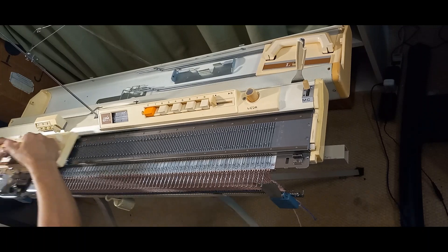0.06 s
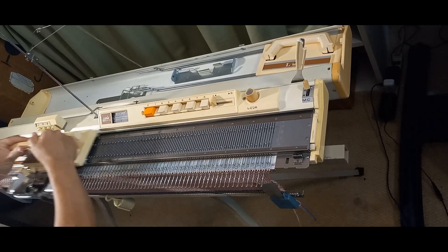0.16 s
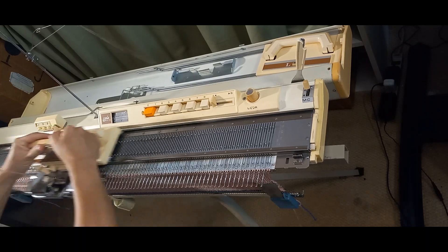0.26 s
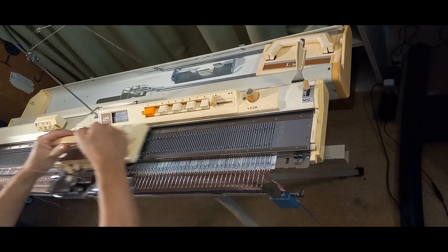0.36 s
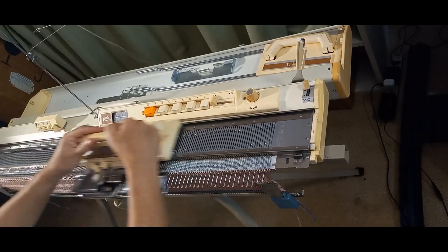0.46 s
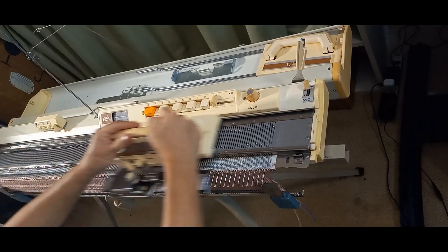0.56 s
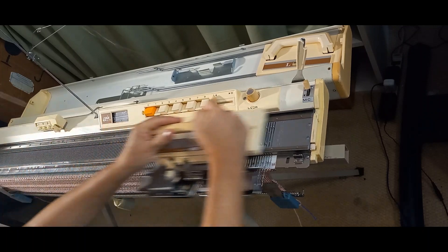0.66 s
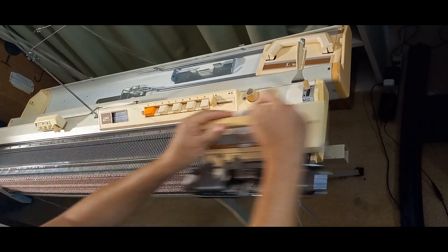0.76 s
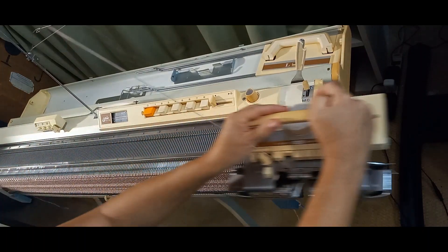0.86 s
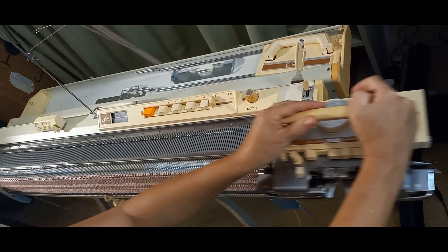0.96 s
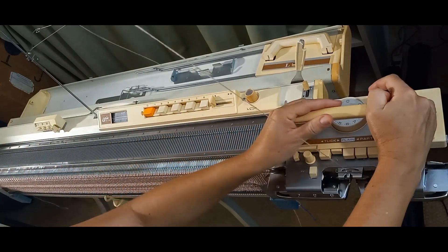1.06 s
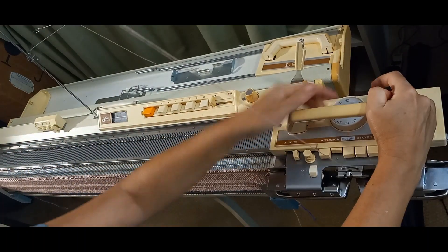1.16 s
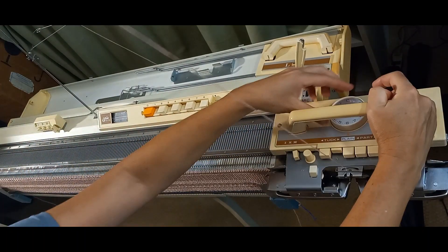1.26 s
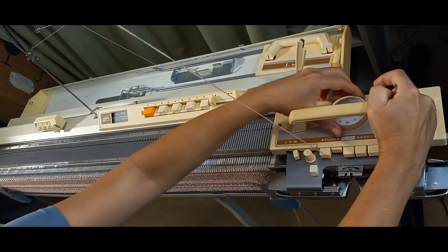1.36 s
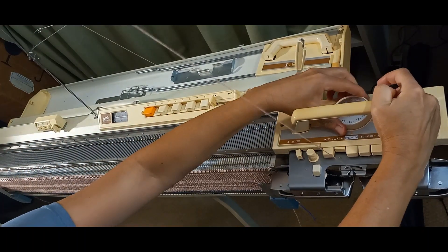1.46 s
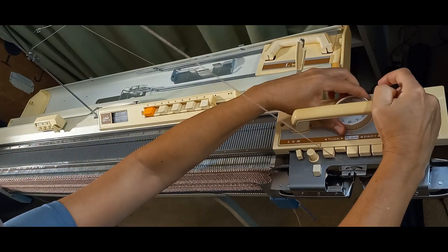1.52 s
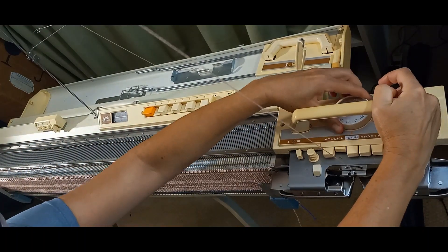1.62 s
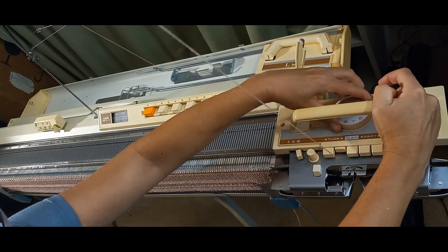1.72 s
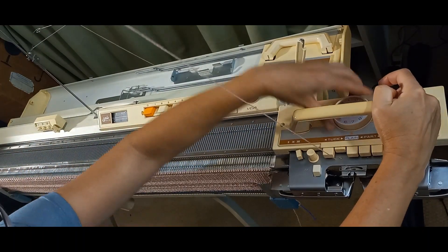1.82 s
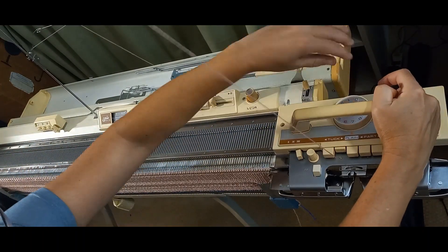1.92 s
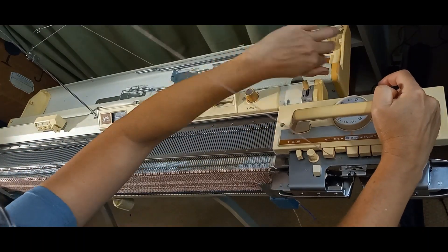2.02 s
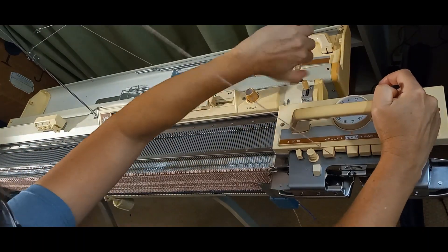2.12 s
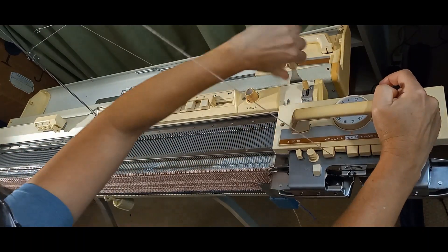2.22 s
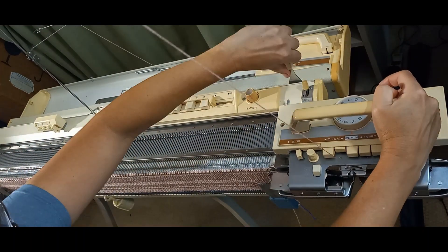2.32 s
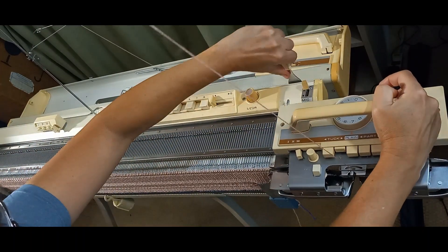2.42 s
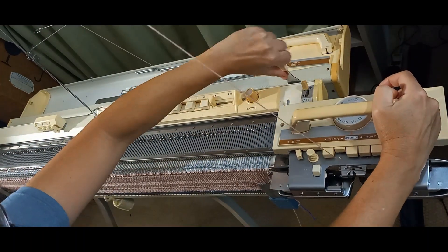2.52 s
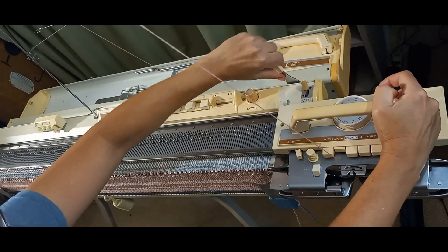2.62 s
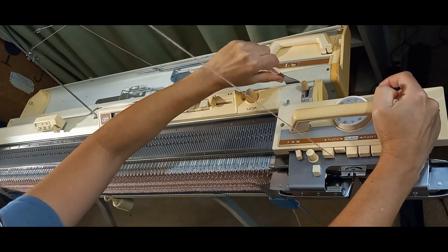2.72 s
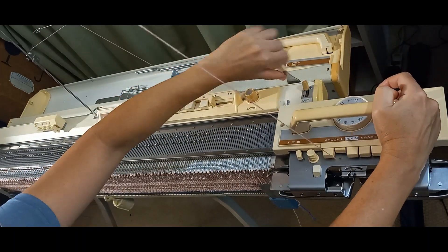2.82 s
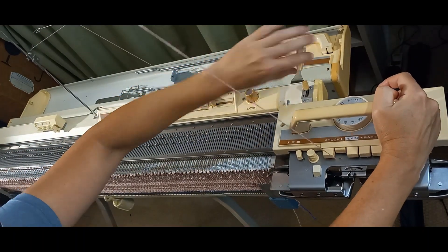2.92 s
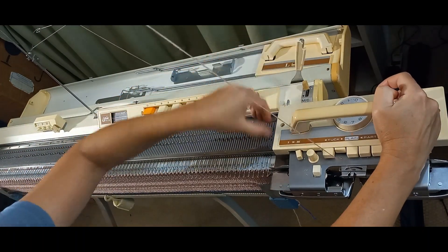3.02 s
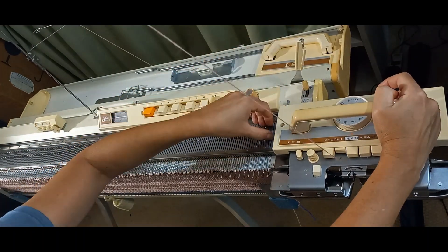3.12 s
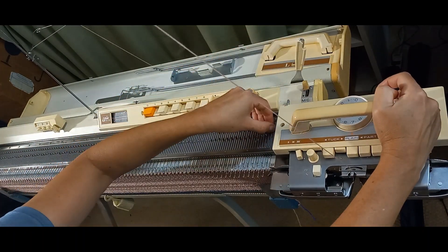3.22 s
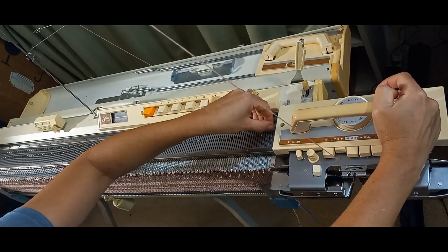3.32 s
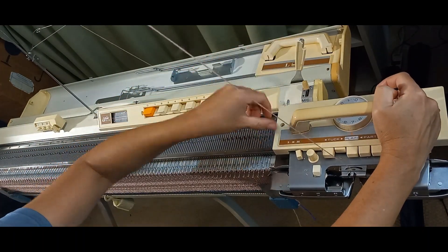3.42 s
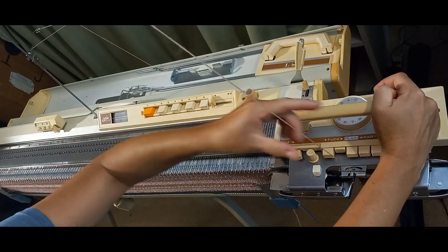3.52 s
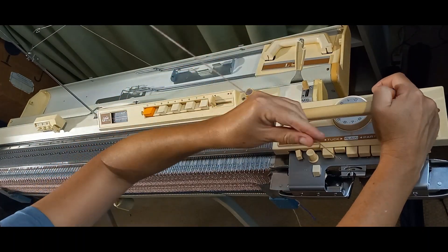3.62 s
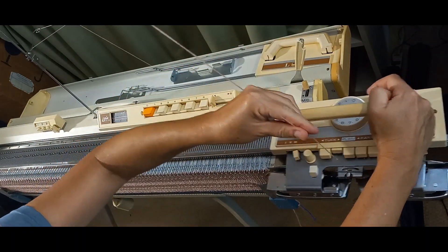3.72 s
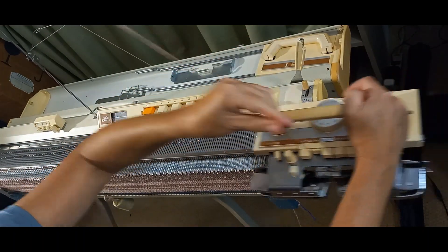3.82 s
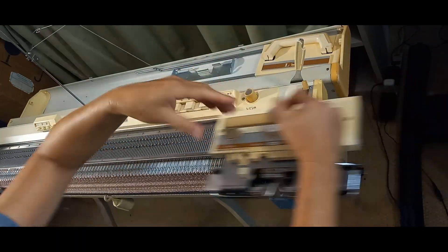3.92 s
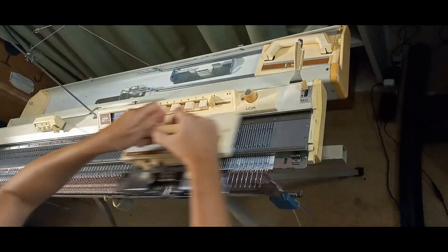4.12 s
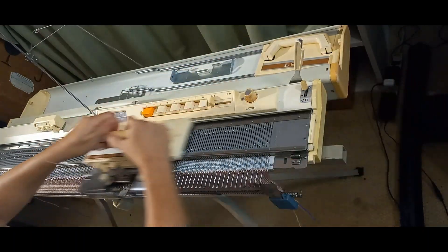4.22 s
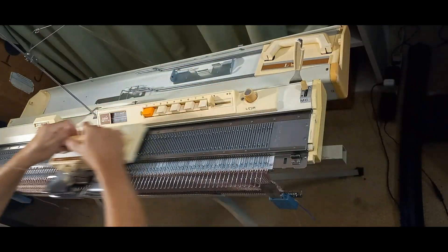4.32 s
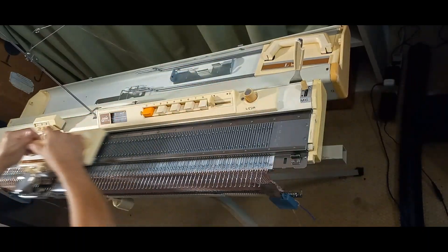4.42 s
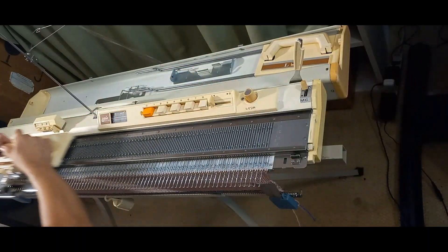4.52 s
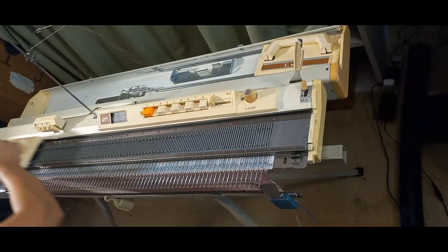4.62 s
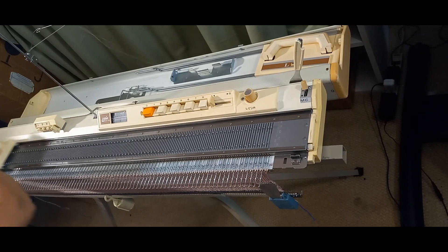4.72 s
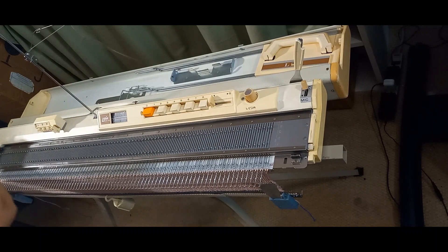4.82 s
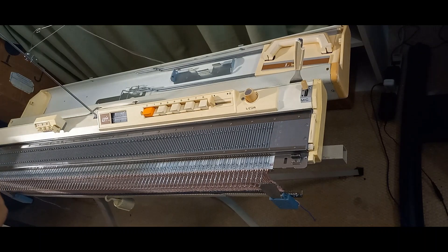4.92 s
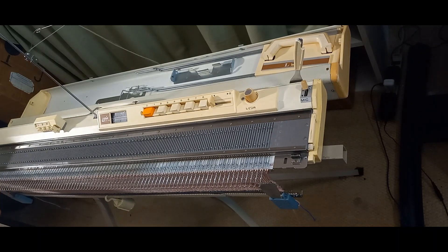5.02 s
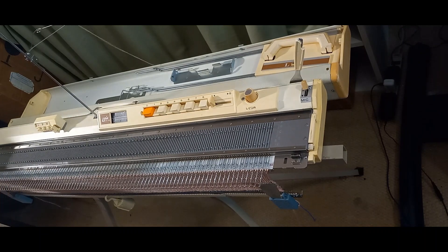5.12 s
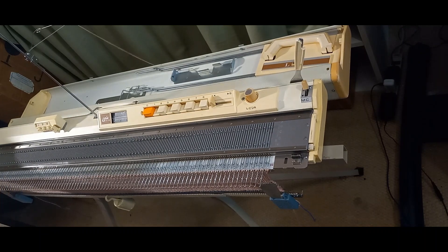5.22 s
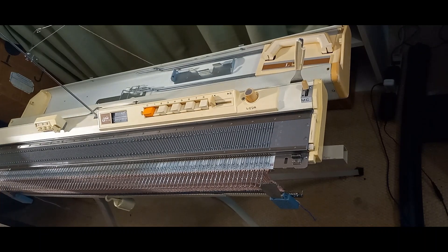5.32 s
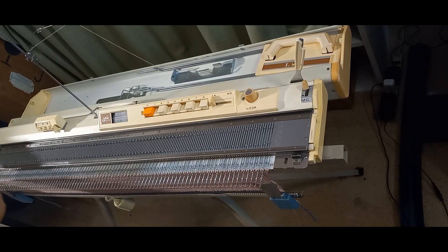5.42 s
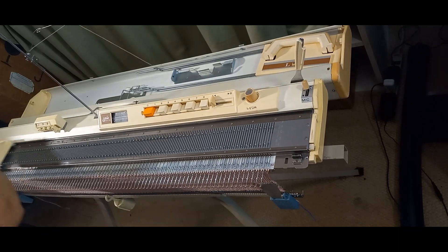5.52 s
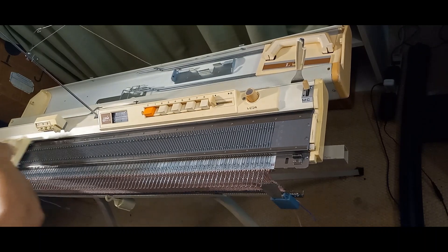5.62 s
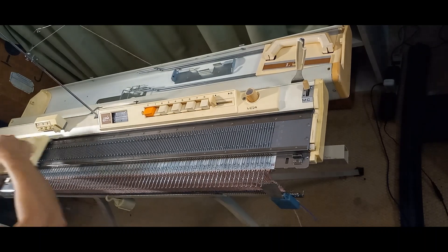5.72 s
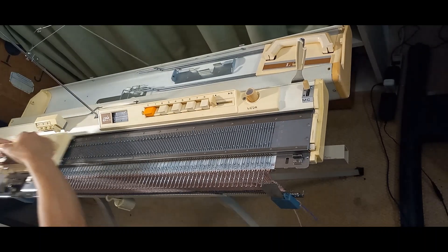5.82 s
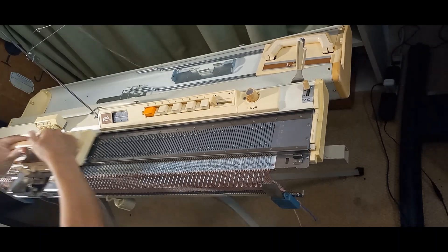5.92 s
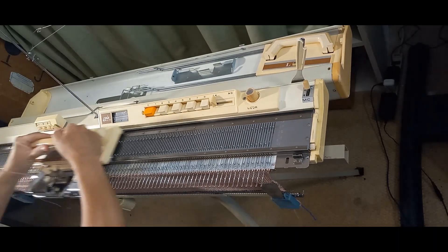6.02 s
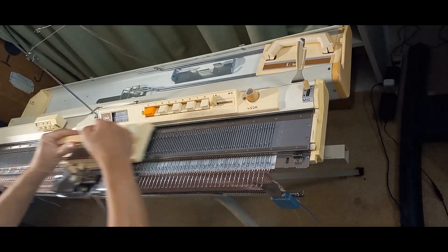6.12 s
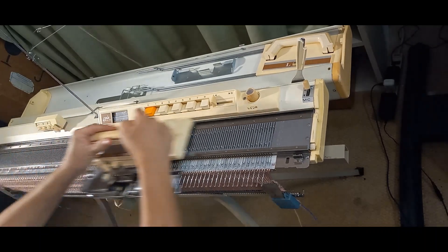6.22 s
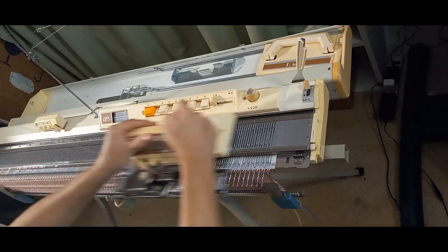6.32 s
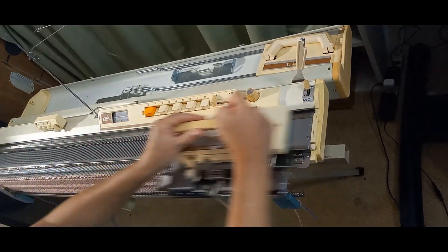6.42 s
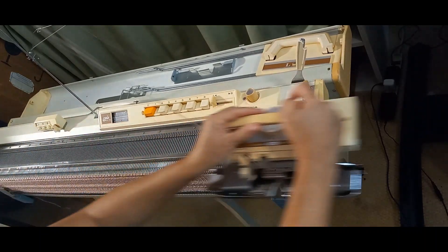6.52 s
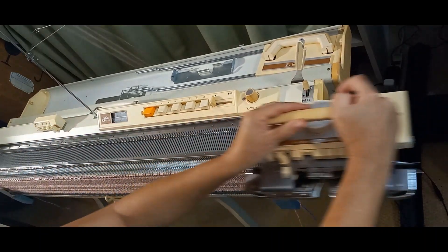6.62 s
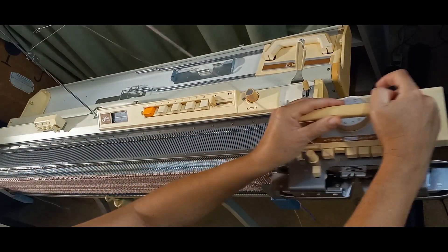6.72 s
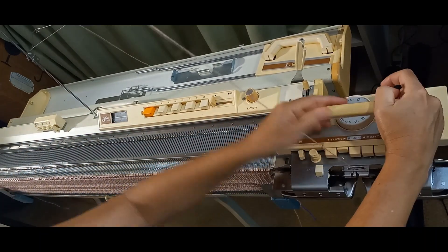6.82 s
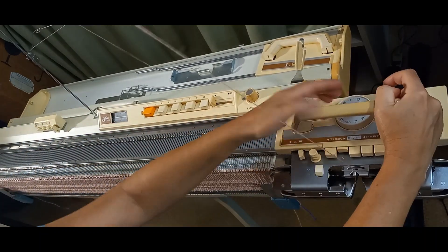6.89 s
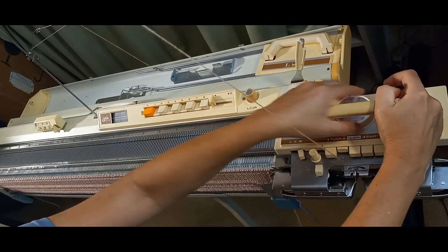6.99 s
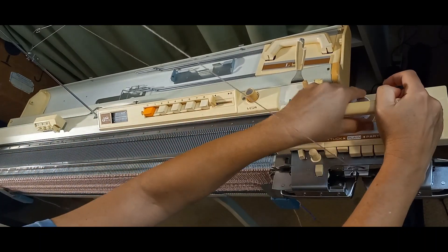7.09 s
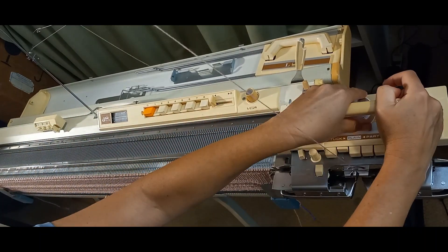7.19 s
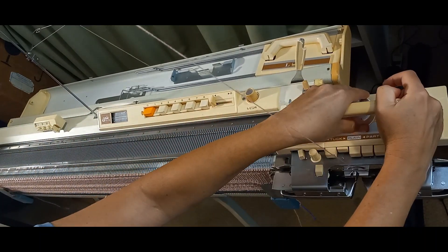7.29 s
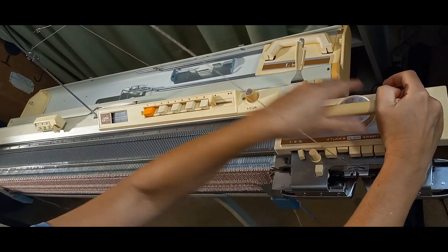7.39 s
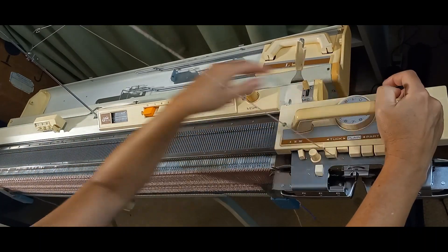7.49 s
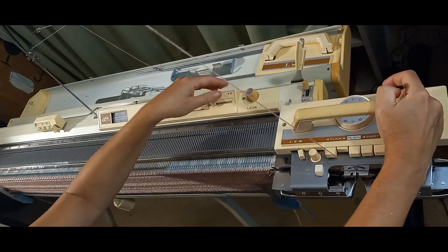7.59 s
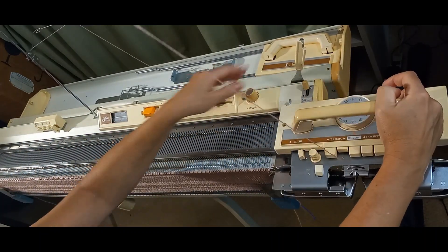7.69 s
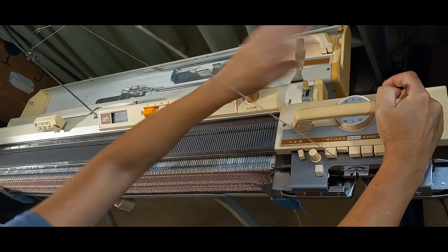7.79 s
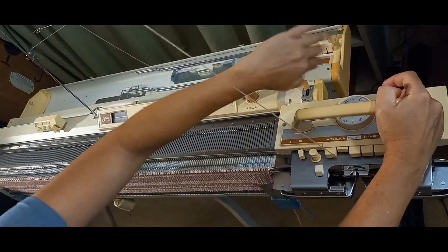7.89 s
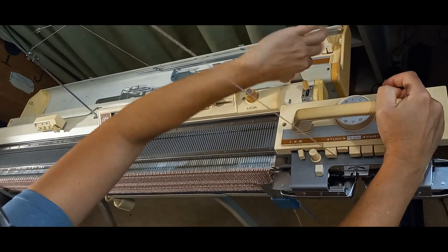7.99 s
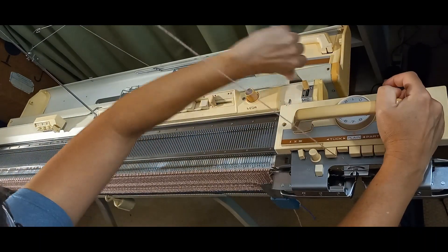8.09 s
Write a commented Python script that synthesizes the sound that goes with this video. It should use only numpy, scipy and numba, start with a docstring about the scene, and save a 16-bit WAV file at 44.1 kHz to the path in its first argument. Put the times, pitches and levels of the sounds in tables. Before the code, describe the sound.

A hand-pushed knitting machine carriage is already clattering loudly over metal needles, with thin squeaks, and stops with a hard snap after about a second. Levers click and parts knock on the plastic case, then a second harsh run follows. After a short pause with a few clicks comes a third, ending in a bright snap and more clicks. Close stereo microphone, small indoor room, low hum.

```python
"""At once a dense clatter is heard: a knitting machine carriage, pushed by hand three times along its bed.
Noise shaped by random needle ticks makes the clatter; resonant noise makes housing, rail and table ring along.
Between passes, decaying noise and damped sines give levers and knocks on the case, over a low room tone.
Gliding sines squeak, short modes tick, and the gain control of a small stereo camera close by rides it all."""
import sys
import numpy as np
from scipy import signal
from scipy.fft import rfft, irfft, next_fast_len
from scipy.io import wavfile
from scipy.ndimage import uniform_filter1d
from numba import njit

SR = 44100
rng = np.random.default_rng(int(sys.argv[2]) if len(sys.argv) > 2 else 0)


def generate_wav(sig):
    """Save sig (samples, or channels by samples) to the path in sys.argv[1] as 16-bit PCM at SR."""
    pcm = np.round(np.clip(np.atleast_2d(sig).T, -1, 1) * 32767).astype(np.int16)
    wavfile.write(sys.argv[1], SR, pcm)


def linear_from_db(decibels):
    """Turn decibels (scalar or array-like) into linear amplitude factors; 0 gives 1."""
    return 10 ** (np.asarray(decibels, float) / 20)


N = 359415
TIME = np.arange(N) / SR
SIZE = next_fast_len(N)
FREQ = np.maximum(np.arange(SIZE // 2 + 1) * SR / SIZE, 1)

# room hum and hiss, relative spectra: pitch_hz, density_db
HUM_SPECTRUM = [(18, -68), (30, -41), (76, -57), (102, -12), (177, 2), (257, -5.5), (519, -11.5), (579, -7),
                (991, -19), (1210, -25.5), (2500, -29.5), (3250, -30), (5500, -120)]
HISS_SPECTRUM = [(710, -10.5), (1200, -1), (1720, -5.5), (2050, -8.5), (3310, -11.5), (3600, -10),
                 (5570, -14), (7670, -15), (8450, -13), (15400, -18.5)]
# likeness of left and right, for near sources and for the room: pitch_hz, correlation
NEAR_LIKENESS = [(60, 0), (300, 0.85), (700, 0.57), (1400, 0.39), (3100, 0.45), (6000, 0.)]
ROOM_LIKENESS = [(60, 0.2), (300, 0.12), (700, 0.06), (3000, 0.012)]
# soft deep thumps, under some of the clicks: start_s, level_db
SOFT_THUMPS = [(1.326, -61), (1.874, -56), (2.006, -65), (2.315, -55), (2.984, -54), (3.855, -54),
               (3.903, -46), (5.03, -52), (5.464, -55), (7.496, -73), (8.125, -55)]
# the table booms as a push sets in: start_s, level_db
SHOVES = [(0.02, -41), (5.5, -34.5)]
# the table resonance of that boom: pitch_hz, width_hz, level_db
SHOVE_RESONANCE = [(259, 41, 0)]
# fingers and yarn scrape over the carriage:
# loudest_s, level_db, swell_db_per_s, fade_db_per_s, housing_db re scrape
SCRAPES = [(2.15, -49.5, 900, 200, 3.5), (2.64, -46, 95, 75, -1), (2.751, -38.5, 350, 501, -1.5),
           (2.953, -34.5, 341, 167, 1.5), (3.851, -38, 1105, 3000, -1), (5.039, -27.5, 1097, 550, -8)]
# a small steel part rings on when the carriage stops: start_s, level_db
PINGS = [(.94, -37), (6.68, -32.5)]
# levers snap over: start_s, snap_db, case_ring_db re snap, decay_s
LEVERS = [(1.3272, -18.5, -21, 0.079), (1.875, -18, -16, 0.087), (1.9822, -25.5, -12.5, 0.12),
          (2.3156, -17, -17, 0.086), (3.8552, -13.5, -15, 0.12), (5.275, -21.5, -9, 0.11),
          (5.391, -23.5, -7.5, 0.1), (7.0778, -18, -14, 0.12), (7.4946, -15, -17, 0.093)]
# fingers and parts knock the case:
# start_s, snap_db, case_ring_db re snap, favoured_hz, housing_knock_db re snap
KNOCKS = [(0.9904, -24, -5, 651, 0), (1.002, -25, -11, 711, -15), (1.065, -33, -5, 651, -7),
          (1.0794, -33, -10, 678, -5), (2.0066, -15, -17.5, 970, -4.5), (2.14, -45, 5, 1310, 17.5),
          (2.3296, -25, -9, 735, 2), (2.446, -50, -3, 1310, 18), (2.477, -35.5, -8, 1190, -3),
          (2.993, -16, -4.5, 708, 7.5), (3.0195, -27, -2, 700, 5), (5.0455, -31, 5, 720, 0),
          (3.302, -34, -20, 651, -2), (3.8652, -22, -23, 662, 3), (6.704, -15.5, -7.5, 764, 2.5),
          (6.818, -46, 8, 1150, 2), (6.9242, -37.5, -7, 680, 1), (7.339, -34, -16.5, 706, 1),
          (8.096, -34, -18, 1350, 2), (8.1256, -24.5, -23, 980, -3.5)]
# parts slide home with a soft start:
# start_s, snap_db, case_ring_db re snap, housing_knock_db re snap, decay_s
SLIDES = [(2.819, -28, -28, 4, 0.11), (2.8746, -12, -19, -3, 0.093), (2.9866, -5, -18.5, -7.5, 0.081),
          (5.0344, -21.5, 1.5, 6.5, 0.13)]
# cams catch or drop the end needles: start_s, snap_db, housing_knock_db re snap, crack_db re snap
CATCHES = [(0.961, -7, -16, 10), (3.904, -14, -12, -3), (3.919, -14.5, -21, 18), (4.911, -6, -19, 4),
           (5.465, -19, 2, 8), (5.492, -19.5, -5, 6), (5.552, -12.5, -31, 7), (6.6795, -4, -17, 8)]
# relative spectrum of a snap: pitch_hz, density_db
SNAP_SPECTRUM = [(1470, -36), (2500, -17.5), (4070, -1), (4520, -2.5), (4870, -5.5), (7930, -3.5),
                 (8800, -8), (10000, -8.5), (13000, -20), (22000, -120)]
# plastic case modes: pitch_hz, level_db, t60_s
CASE_MODES = [(708, 4.5, 0.11), (989, -1, 0.18), (1161, 4.5, 0.07), (1187, 5.5, 0.068)]
# the last needle snaps back as the carriage stops: start_s, level_db
STOPS = [(0.9605, -11.5), (6.6795, -8)]
# modes of that needle, and of a lever's steel spring: pitch_hz, level_db, t60_s
STOP_MODES = [(3050, 1, 0.0081), (4000, -2, 0.006), (5100, 1, 0.0099), (6300, -9, 0.0064),
              (9200, -5, 0.0054), (11800, -2, 0.005)]
SPRING_MODES = [(4005, -2, 0.015), (4410, -3, 0.01), (5880, -3, 0.015), (7075, 0, 0.018), (8000, -3, 0.012),
                (11200, -5, 0.01)]
# narrow gliding whistles: steel squeaking on steel, and near 2.95 s a narrow band of the finger scrape:
# start_s, length_s, first_hz, last_hz, level_db
SQUEAKS = [(0.3, 0.27, 4290, 4340, -26.5), (0.813, 0.089, 6040, 5500, -20), (0.85, 0.074, 4550, 4470, -24),
           (2.705, 0.02, 3100, 3100, -46), (2.94, 0.035, 1596, 2060, -34.5),
           (2.947, 0.042, 1930, 1750, -39), (6.198, 0.1, 4400, 4100, -24), (6.44, 0.082, 6000, 6200, -24),
           (6.536, 0.082, 5750, 5730, -20), (6.567, 0.038, 2400, 2390, -18)]
# the carriage jolts over a cam mid-pass: start_s, level_db, favoured_hz
JOLTS = [(0.39, -7, 2800), (4.478, -2, 2050), (5.596, -17, 1500), (6.1492, -4, 2700)]
# one list a pass: time_s, clatter_db, housing_db re clatter, latches_db re clatter
PASSES = [
    [(0.0, -13.5, -6.5, -4.5), (0.2, -12.5, -7.5, -6), (0.4, -10.5, -11, -12.5), (0.82, -9, -11, -10),
     (0.91, -11, -10, -3), (0.934, -25.5, -5, -1), (0.97, -33, 2, -7), (1.03, -43, -4, -12),
     (1.18, -58, 4, -12)],
    [(3.89, -56, -2, -16), (3.913, -38, 6, -14), (3.922, -19, -15.5, -18), (3.98, -12, -11.5, -21),
     (4.3, -11.5, -12, -18), (4.76, -10.5, -7, -24), (4.82, -13.5, -8.5, -28), (4.9, -25.5, -5.5, -17),
     (5.04, -50.5, -9, -13)],
    [(5.48, -46, -3, -10), (5.5, -25, -13, -23), (5.53, -26, -9.5, -20), (5.58, -14, -10, -22),
     (5.8, -11, -7.5, -10), (6.05, -10, -10.5, -10), (6.55, -8.5, -11, -10), (6.635, -11, -8, -3),
     (6.665, -21, -9, -9), (6.75, -45, 1, -17), (6.93, -61, -8, -19)],
]
# relative spectrum of the needle ticks: pitch_hz, density_db
NEEDLE_SPECTRUM = [(1180, -21), (2000, -26), (2410, -2.5), (3280, -4.5), (4200, -2.5), (5420, -4),
                   (6770, -2), (7630, -3), (8380, 0), (15400, -2)]
# resonances of housing, table, loose latches and steel rail: pitch_hz, width_hz, level_db
HOUSING = [(1350, 960, 3.5), (1577, 210, -0.5), (1752, 55, -4), (1895, 114, 0), (2118, 140, -1.5),
           (2390, 86, -4), (2885, 2000, -2)]
TABLE = [(176, 45, -9.5), (220, 35, -13.5), (279, 43, -3.5), (366, 45, -4.5), (438, 45, -1), (512, 45, -6),
         (614, 71, 1), (708, 115, -0.5), (776, 55, -4.5), (873, 60, -2.5), (940, 53, -3), (1017, 44, -4.5),
         (1179, 46, -6)]
LATCHES = [(6150, 870, -15), (5130, 3800, -2)]
RAIL = [(4440, 1200, 0.27), (8270, 500, -1), (6770, 350, -0.00021)]
# centre of a gliding narrow band, thinned at random during the passes: time_s, pitch_hz
THINNED_PATH = [(0.0, 830), (0.2, 930), (0.33, 1070), (0.5, 1010), (0.65, 970), (0.84, 905), (3.97, 820),
                (4.15, 970), (4.3, 1080), (4.5, 1100), (4.75, 970), (5.53, 1050), (5.8, 960), (5.92, 786),
                (6.06, 970), (6.25, 990), (6.45, 1020), (6.56, 830)]
# further narrow bands thinned at random: pitch_hz, width_hz, wander_share, readiness (-1 to 1)
THINNED_BANDS = [(332, 73, 0.026, 0.46), (475, 106, 0.097, -0.19), (720, 110, 0.06, -0.8),
                 (830, 108, 0.044, -0.22)]


def rms1(x):
    """Normalization: scale to rms 1."""
    return x / np.sqrt(np.mean(x ** 2))


def points(table):
    """Spectral interpolation: (Hz, value) points on a log-frequency axis."""
    hz, value = np.transpose(table)
    return np.interp(np.log(FREQ), np.log(hz), value)


def peaks(table):
    """Resonance: the summed gain of simple resonators, each applied twice."""
    return sum(linear_from_db(db) / (1 + ((FREQ ** 2 - hz ** 2) / (FREQ * width)) ** 2) for hz, width, db in table)


def noise(gain, likeness=NEAR_LIKENESS):
    """Interaural coherence: coloured noise at rms 1, likeness set by frequency, the left side first."""
    right_late_s = 6e-5
    late = np.exp(-2j * np.pi * FREQ * right_late_s)
    mid, side = rfft(rng.standard_normal((2, SIZE)))
    like = np.clip(points(likeness), 0, 1)
    mid, side = mid * np.sqrt(1 + like), side * np.sqrt(1 - like)
    return rms1(irfft(gain * np.array([mid + side, (mid - side) * late]), SIZE)[:, :N])


def highpass(x, order, hz):
    """High-pass filtering: a Butterworth filter removes what lies below hz."""
    return signal.sosfilt(signal.butter(order, hz, "high", fs=SR, output="sos"), x)


def fade(power, t60):
    """Exponential decay: every kick of power dies away by 60 dB in t60 s."""
    return signal.lfilter([1], [1, -np.exp(-np.log(1e6) / (t60 * SR))], power)


def walls(power):
    """Reverberation: the walls spread a share of the power into a tail."""
    t60_s, share_db = 0.19, -33
    return power + linear_from_db(2 * share_db) * fade(power, t60_s) * np.log(1e6) / (t60_s * SR)


def walk(rate):
    """Random modulation: levels held 1 / rate s, smoothed twice, without slow drift; rms 1."""
    k = int(SR / rate)
    held = np.repeat(rng.standard_normal(N // k + 1), k)
    smooth = uniform_filter1d(uniform_filter1d(held, k), k)[:N]
    return rms1(smooth - uniform_filter1d(smooth, size=6 * k))


def clatter(rate, spread_db, t60):
    """Poisson process: power of overlapping ticks at random moments, some harder than the rest; mean 1."""
    hardness_db = spread_db * rng.exponential(size=N).clip(0, 4)
    power = fade((rng.random(N) < rate / SR) * linear_from_db(2 * hardness_db), t60)
    return power / power.mean()


def drifting(x, share):
    """Frequency shift by playing speed: as the speed wanders slowly, a resonance glides up and down."""
    place = np.arange(N) + np.cumsum(share * walk(4))
    return np.array([np.interp(place, np.arange(N), side) for side in x])


def ringing(table, gap_db, rate, order=1, drift=0.025):
    """Random band gating: each resonance drifts in pitch and is dimmed at random by up to gap_db."""
    total = 0
    for hz, width, db in table:
        gap = (2 * (walk(rate) - .3)).clip(0, 1)
        band = noise(peaks([(hz, width * np.sqrt(order), 0)]) ** order)
        total = total + linear_from_db(db - gap_db * gap) * drifting(band, drift)
    return rms1(total)


def wavering(turns, a, b):
    """Quadrature modulation: size and phase of a tone waver by two walks, differently left and right."""
    sine, cosine = np.sin(2 * np.pi * turns), np.cos(2 * np.pi * turns)
    return np.array([a * sine + b * cosine, b * sine + a * cosine])


def room():
    """Stationary background noise: a wavering low hum and a smooth hiss."""
    hum_db, hiss_db = -41.5 + 1.03 * walk(9), -49.5 + 2.0 * walk(15)
    hum = linear_from_db(hum_db) * noise(linear_from_db(points(HUM_SPECTRUM)), ROOM_LIKENESS)
    hiss = linear_from_db(hiss_db) * noise(linear_from_db(points(HISS_SPECTRUM)), ROOM_LIKENESS)
    return hum + hiss


def thumps():
    """Low-frequency transient: soft deep thumps of low resonant noise with a bell-shaped power."""
    power = sum(linear_from_db(2 * db) * np.exp(-((TIME - s - .01) / 0.015) ** 2) for s, db in SOFT_THUMPS)
    return np.sqrt(power) * noise(peaks([(38.7, 52, 0)]))


def shoves():
    """Forced resonance: the table swells low as the push sets in, then dies away."""
    peak_after_s = 0.13
    swell = 0
    for s, db in SHOVES:
        x = (TIME - s).clip(0) / peak_after_s
        swell = swell + linear_from_db(db) * x * np.exp(1 - x)
    return swell * noise(peaks(SHOVE_RESONANCE))


def scrapes():
    """Friction: a grainy rub swells and fades, partly sounding in the housing."""
    power = np.zeros((2, N))
    for s, db, swell, dies, housing_db in SCRAPES:
        below_peak_db = np.maximum(swell * (s - TIME), dies * (TIME - s))
        power += linear_from_db(2 * (db - below_peak_db + np.array([[0], [housing_db]])))
    rub, body = power * clatter(900, 0.9, 0.036)
    return np.sqrt(rub) * noise(linear_from_db(points(NEEDLE_SPECTRUM))) + np.sqrt(body) * noise(peaks(HOUSING))


def pings():
    """Lightly damped vibration: a thin, slightly wavering steel ring."""
    ping_hz, t60_s = 10445, 0.45
    power = 0
    for s, db in PINGS:
        power = power + linear_from_db(2 * db) * (TIME > s) * np.exp(-np.log(1e6) * np.abs(TIME - s) / t60_s)
    return np.sqrt(power) * wavering(ping_hz * TIME, 1 + .2 * walk(120), 0.4 * walk(120))


def blows():
    """Impact parameters, one form: s, snap dB, case dB, case Hz, knock dB, top dB, decay s, crack dB."""
    levers = [(s, db, case_db, 1170, -10.5, -7, t60, 9.5) for s, db, case_db, t60 in LEVERS]
    # harder knocks are brighter
    knocks = [(s, db, case_db, hz, knock_db, 9 + .35 * db, 0.1, 1.5)
              for s, db, case_db, hz, knock_db in KNOCKS]
    slides = [(s, db, case_db, 705, knock_db, 3.5, t60, -4.5)
              for s, db, case_db, knock_db, t60 in SLIDES]
    catches = [(s, db, -23, 900, knock_db, 1.5, 0.072, crack_db)
               for s, db, knock_db, crack_db in CATCHES]
    return levers + knocks + slides + catches


def clicks():
    """Impact: a crack and rattling snap, a housing knock, a table thud and a ring of the plastic case."""
    crack_t60_s, lead_s, thud_db = 0.006, 0.00097, 5  # thud re case ring
    power, ring = np.zeros((4, N)), np.zeros(N)
    events = blows()
    chance = rng.standard_normal((len(events), len(CASE_MODES), 2))
    for (s, db, case_db, case_hz, knock_db, top_db, t60, crack_db), luck in zip(events, chance):
        near = slice(int((s - .04) * SR), int((s + .25) * SR))
        t = TIME[near] - s
        after = t.clip(0)
        # the weaker the crack, the longer the sound builds up first
        lead = np.exp(t.clip(None, 0) / (lead_s * linear_from_db(-crack_db)))
        crack = linear_from_db(2 * crack_db) * (t > 0) * np.exp(-np.log(1e6) * after / crack_t60_s)
        shape = lead * np.exp(-np.log(1e6) * after / t60) + crack
        parts_db = np.array([[0], [knock_db], [top_db], [case_db + thud_db]])
        power[:, near] += linear_from_db(2 * (db - 12.5 + parts_db)) * shape  # -12.5: peak level to mean power
        for (hz, mode_db, mode_t60), (detune, vary) in zip(CASE_MODES, luck):
            struck_db = -12 * abs(np.log2(hz / case_hz))  # where it is struck picks the mode
            sine = np.sin(2 * np.pi * hz * (1 + 0.026 * detune) * after)
            envelope = np.exp(-np.log(1000) * after / mode_t60) * (1 - np.exp(-after / 0.0027))
            ring[near] += linear_from_db(db + case_db + mode_db + struck_db - 7.5 + 0.51 * vary) * sine * envelope
    colours = linear_from_db(points(SNAP_SPECTRUM)), peaks(HOUSING), peaks([(11800, 22000, 0)]), peaks(TABLE)
    bursts = sum(np.sqrt(walls(p)) * noise(c) for p, c in zip(power, colours))
    return highpass(bursts + ring, 2, 300)


def ticks(events, modes, low_hz, vary_db):
    """Modal synthesis: a hard tick rings a few short modes, their levels varying by tick and side."""
    out, t = np.zeros((2, N)), TIME[:SR // 20]
    hz, db, t60 = np.transpose(modes)
    rings = np.cos(2 * np.pi * hz[:, None] * t) * np.exp(-np.log(1000) * t / t60[:, None])
    for (s, hit_db), luck in zip(events, rng.standard_normal((len(events), 2, len(modes)))):
        out[:, int(s * SR):][:, :len(t)] += linear_from_db(hit_db + db + vary_db * luck) @ rings
    return highpass(out, 4, low_hz)


def stops():
    """Elastic release: the last needle snaps back, and lever springs tick as they snap over."""
    delay_s, spring_db = 0.000997, -14  # both re the lever's snap
    springs = [(s + delay_s, db + spring_db) for s, db, *_ in LEVERS]
    return ticks(STOPS, STOP_MODES, 2000, 1) + ticks(springs, SPRING_MODES, 2000, 2.5)


def squeaks():
    """Stick-slip friction: narrow gliding whistles, mostly of steel on steel, swell and fade."""
    waver_hz = 150
    out, a, b = np.zeros((2, N)), walk(waver_hz), walk(waver_hz)
    for s, length, first_hz, last_hz, db in SQUEAKS:
        near = slice(int(s * SR), int((s + length) * SR))
        t = TIME[near] - s
        turns = first_hz * t + (last_hz - first_hz) * t ** 2 / (2 * length)
        swell = np.sqrt(np.abs(np.sin(np.pi * t / length)))
        out[:, near] += linear_from_db(db) * swell * wavering(turns, a[near], b[near])
    return out


def jolts():
    """Impulse response: a compact knock sets every housing resonance ringing at once."""
    rise_s, width_hz = 0.00085, 82
    out, t = np.zeros(N), TIME[:SR // 20]
    envelope = np.exp(-np.pi * width_hz * t) * (1 - np.exp(-(t / rise_s) ** 2))
    chance = rng.standard_normal((len(JOLTS), len(HOUSING), 2))
    for (s, db, struck_hz), luck in zip(JOLTS, chance):
        for (hz, _, mode_db), (vary, turn) in zip(HOUSING, luck):
            level_db = db + mode_db + 0.67 * vary - 12 * abs(np.log2(hz / struck_hz))
            sine = np.sin(2 * np.pi * (hz * t + 0.19 * turn))
            out[int(s * SR):][:len(t)] += linear_from_db(level_db) * sine * envelope
    return highpass(out, 4, 1500)


def needle_ticks():
    """Band-wise independence: needles tick at their own pitches, so ticks of the bands do not coincide."""
    centres_hz = 2000 * 1.5 ** np.arange(6)
    shares = [np.exp(-(np.log(FREQ / hz) / .3) ** 2) for hz in centres_hz]
    total = 0
    for share in shares:
        band = np.sqrt(share / (sum(shares) + 1e-9)) * linear_from_db(points(NEEDLE_SPECTRUM))
        total = total + np.sqrt(clatter(1500, 0.6, 0.075) * np.mean(band ** 2)) * noise(band)
    return rms1(total)


def rumble(moving, push_db):
    """Mechanical coupling: the table takes a moment to follow the push, less than in proportion."""
    lag_s, full_push_db, knee_db = 0.024, -5, -23
    lag = lag_s * SR
    slow_db = signal.lfilter([1], [lag, 1 - lag], push_db - push_db[0]) + push_db[0]
    felt_db = np.minimum(slow_db, push_db)
    table_db = -21 + 0.56 * (felt_db - full_push_db) + 1.0 * walk(14)
    table_db += 0.064 * np.minimum(felt_db - knee_db, 0)  # a light push dies sooner in the table
    return moving * linear_from_db(table_db) * ringing(TABLE, 8.1, 22, order=2, drift=0.04)


def carriage():
    """Multiple excitation: needle ticks, steel rail, housing, table and loose latches follow the push."""
    s, db, housing_db, latch_db = np.concatenate(PASSES).T
    moving = sum((TIME >= rows[0][0]) & (TIME <= rows[-1][0]) for rows in PASSES)
    push_db = np.interp(TIME, s, db)
    drag = linear_from_db(.2 * walk(30))  # yarn and cams load the push unevenly
    snags = np.sqrt(clatter(2500, 0.66, 0.033))  # the cams catch several needles at once
    steel = needle_ticks() + linear_from_db(-15.5) * ringing(RAIL, 17.0, 26)
    needles = moving * linear_from_db(push_db) * drag * snags * steel
    body_level = linear_from_db(push_db + np.interp(TIME, s, housing_db) + 0.7 * walk(5.9))
    body_grain = np.sqrt(clatter(1800, 0.97, 0.12)) * drag
    housing = moving * body_level * body_grain * ringing(HOUSING, 4.2, 30)
    latch_level = linear_from_db(push_db + np.interp(TIME, s, latch_db))
    latches = moving * latch_level * np.sqrt(clatter(990, 1.0, 0.19)) * noise(peaks(LATCHES))
    low_cut = signal.ellip(4, 1, 40, 1080, "high", fs=SR, output="sos")
    return signal.sosfilt(low_cut, needles + housing + latches) + rumble(moving, push_db)


def thin_band(x, hz, width, amount):
    """Heterodyne notch: a narrow band around hz is taken out twice while amount is above zero."""
    turn = np.exp(2j * np.pi * np.cumsum(hz) / SR)
    keep = np.exp(-np.pi * width / SR)
    depth = (3 * amount).clip(0, 1)
    for _ in range(2):
        band = signal.lfilter([1 - keep], [1, -keep], x * turn.conj()) * turn
        x = x - depth * 2 * band.real
    return x


def thin_lows(x):
    """Time-varying notches: narrow low bands are thinned at random during the passes."""
    moving = sum(1. * (TIME >= rows[0][0]) * (TIME <= rows[-3][0]) for rows in PASSES)
    moving = uniform_filter1d(moving, size=SR // 20)
    x = thin_band(x, np.interp(TIME, *np.transpose(THINNED_PATH)), 82, moving * (0.44 + walk(12)))
    for hz, width, wander, ready in THINNED_BANDS:
        x = thin_band(x, hz * (1 + wander * walk(3)), width, moving * (ready + walk(16)))
    return x


def scene():
    """Superposition: all sources add up; late on, the level dips briefly."""
    dip_s, dip_fade_s, dip_db = 6.974, .028, -47
    dip = (np.abs(TIME - dip_s) / dip_fade_s).clip(0, 1) ** 2 + linear_from_db(dip_db)
    steady = thin_lows(room() + shoves() + carriage())
    brief = thumps() + scrapes() + pings() + clicks() + stops() + squeaks() + jolts()
    return dip * (steady + brief)


@njit
def ride(wanted_db, pull, wait, recover):
    """Attack, hold and release: gain sinks as wanted, waits once sound drops, then climbs steadily."""
    out, gain, quiet = np.empty(len(wanted_db)), wanted_db[2000], 0.
    for i in range(len(wanted_db)):
        quiet = 0. if wanted_db[i] < gain + 1.5 and wanted_db[i] < 0 else quiet + 1
        if wanted_db[i] < gain:
            gain += pull * (wanted_db[i] - gain)
        elif quiet > wait:
            gain = min(gain + recover, wanted_db[i])
        out[i] = gain
    return out


def gain_control(x):
    """Dynamic compression: loud sound is pulled towards a ceiling, and everything else with it."""
    ceiling_db, grip, bass_grip, bass_hz = -20.5, 0.85, 0.69, 970  # grips: dB per dB
    listen_s, pull_s, wait_s, recover_db_s = 0.0021, 0.1, 0.5, 45
    heard = fade(np.mean(x ** 2, axis=0), np.log(1e6) * listen_s) / (listen_s * SR)
    wanted_db = grip * np.minimum(ceiling_db - 10 * np.log10(heard + 1e-12), 0)
    gain_db = ride(wanted_db, 1 / (pull_s * SR), wait_s * SR, recover_db_s / SR)
    low, high = (signal.sosfiltfilt(signal.butter(3, bass_hz, kind, fs=SR, output="sos"), x)
                 for kind in ("low", "high"))
    # while the sound is loud the lows are pulled down further
    bass_db = bass_grip * uniform_filter1d(wanted_db, size=SR // 25)
    return linear_from_db(gain_db) * (high + linear_from_db(bass_db) * low)


def band_limit(x):
    """A steep low-pass at the top of the band."""
    return signal.sosfilt(signal.butter(12, 17090, fs=SR, output="sos"), x)


def record(dry):
    """Band limitation: the microphones lose the deepest bass, gain control acts, the top is cut steeply."""
    controlled = gain_control(highpass(dry, 2, 50))
    top_cut = signal.ellip(8, .2, 45, 15900, fs=SR, output="sos")
    return band_limit(signal.sosfilt(top_cut, controlled))


dry = scene()
out = record(dry)
generate_wav(out)
```